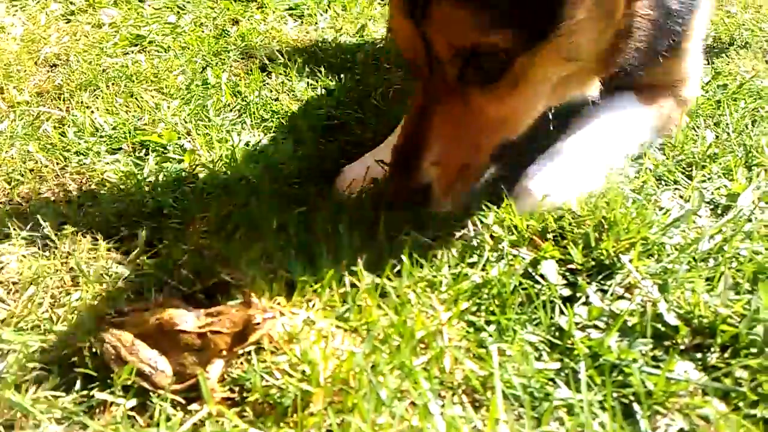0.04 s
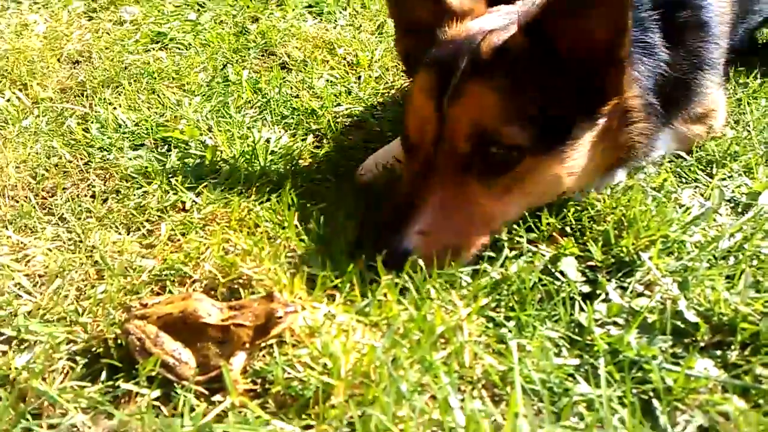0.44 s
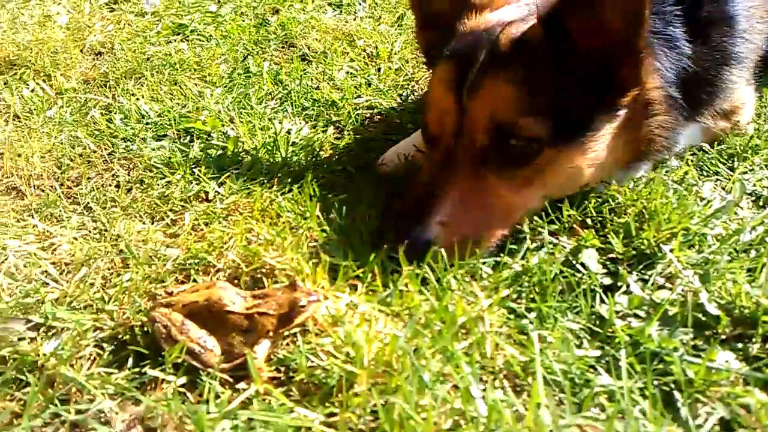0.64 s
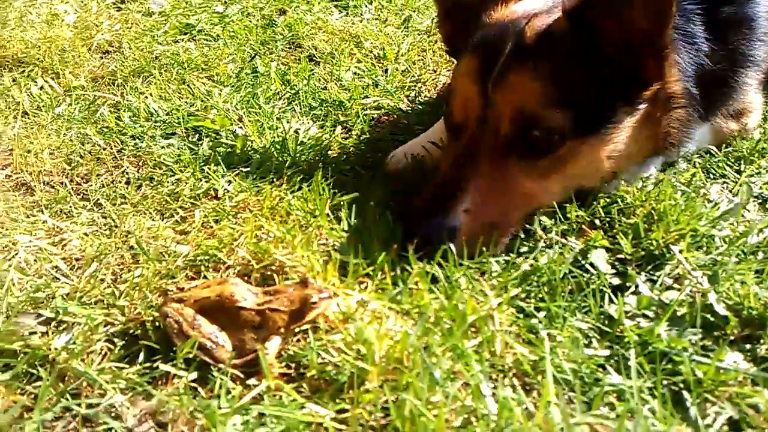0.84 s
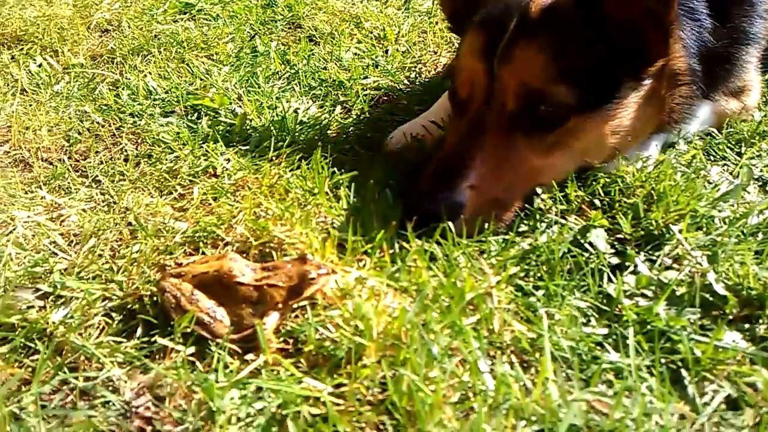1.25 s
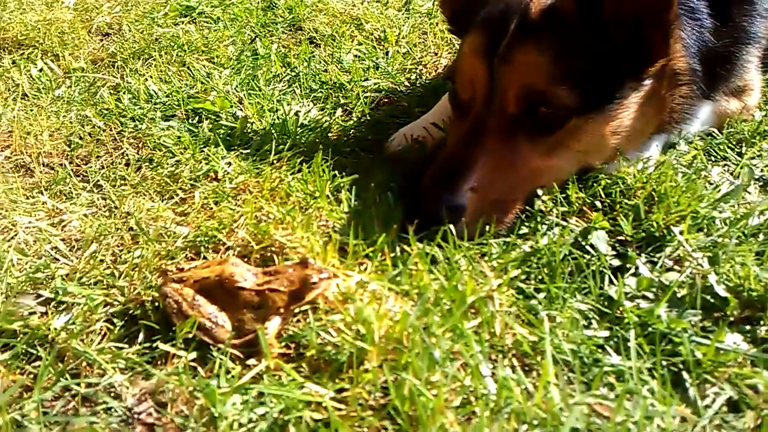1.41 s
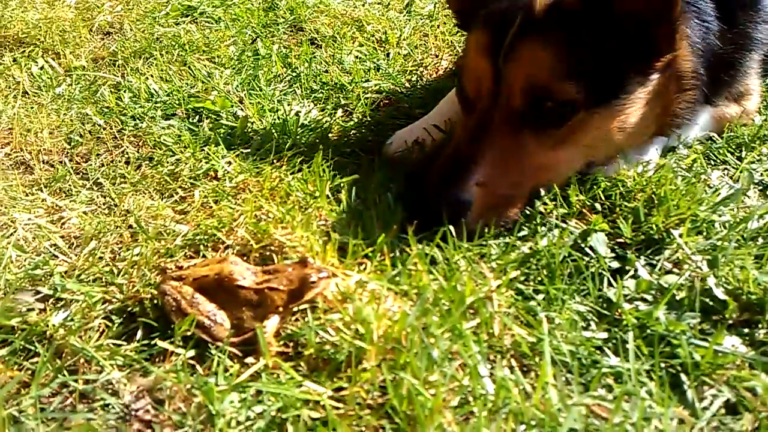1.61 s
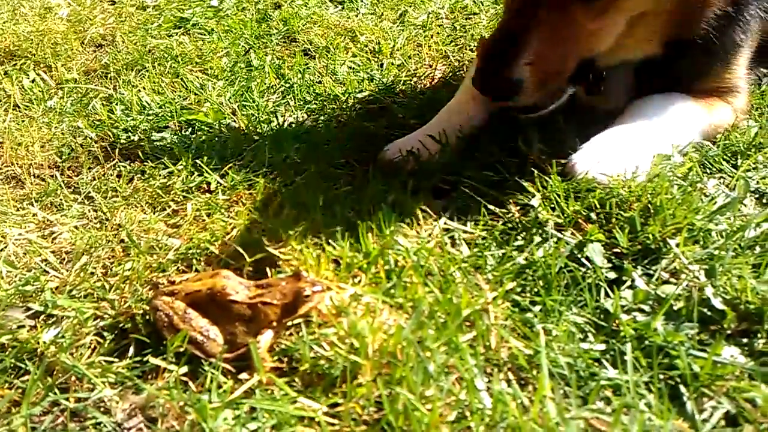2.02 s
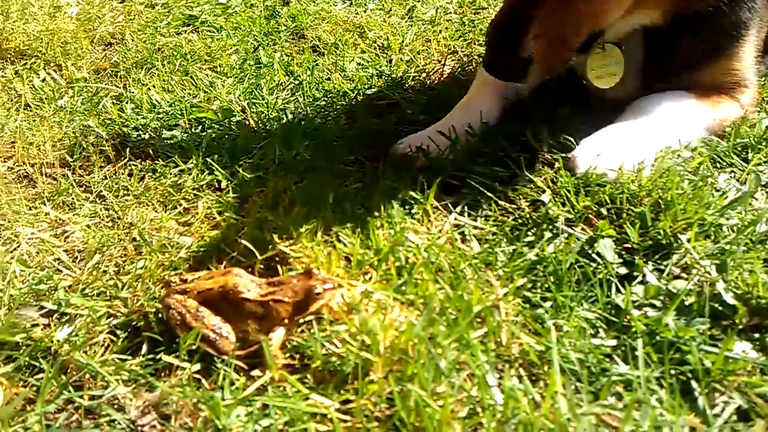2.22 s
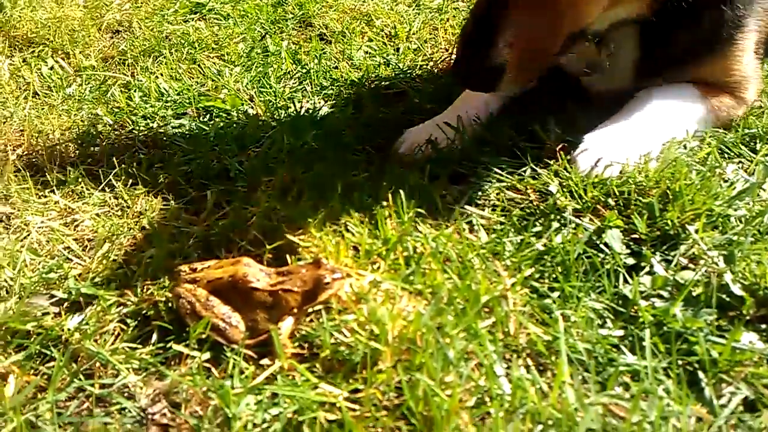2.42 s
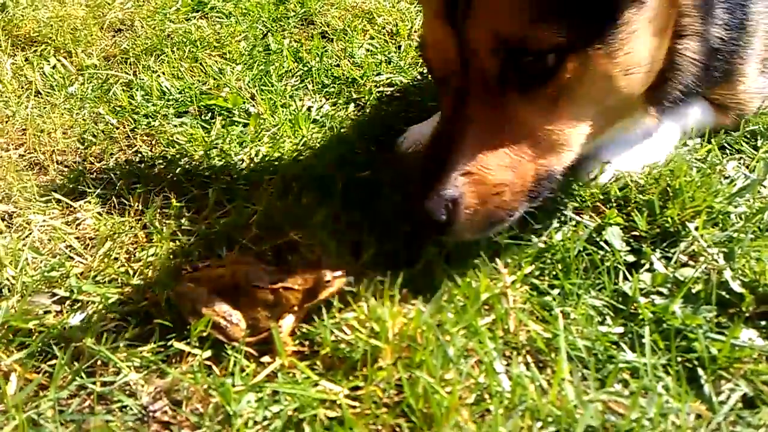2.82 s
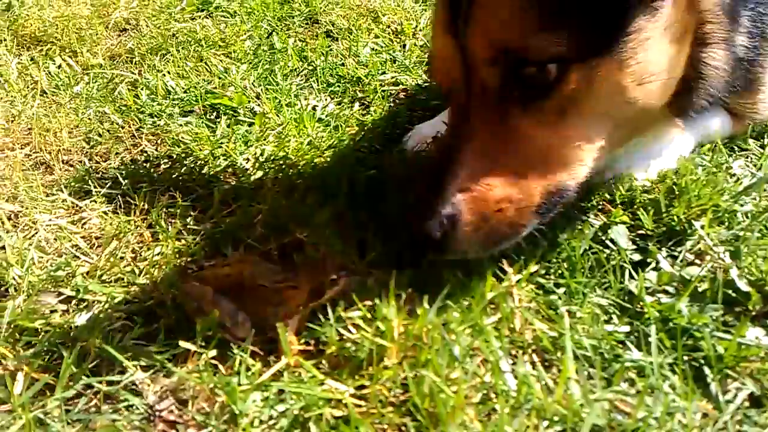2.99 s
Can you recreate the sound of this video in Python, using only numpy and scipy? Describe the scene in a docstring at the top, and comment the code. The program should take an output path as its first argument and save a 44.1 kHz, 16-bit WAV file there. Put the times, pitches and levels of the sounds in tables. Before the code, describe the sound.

Metal tags on a dog's collar clink close by, high and quickly damped, from the start to about 0.5 seconds, with light grass rustles. A lull follows, holding quiet garden air, a barely audible motor hum and a few thin, distant bird notes. From about 2 to 3 seconds the tags clink again in a longer, busier bunch, with small ticks, soft lip smacks and faint rustling.

```python
"""A garden lawn, one microphone close to a dog that nudges about, watching a frog. The metal tags on
its collar clink in two bunches, each ring choked as the tags fall together again; between strikes
they shimmer, slide and tick. Grass rustles under its paws and its lips smack softly. Far off, a bird
slurs a few thin notes over quiet garden air and the faint hum of a motor."""
import sys
import numpy as np
from scipy import signal
from scipy.fft import rfft, irfft
from scipy.io import wavfile

SR = 44100
rng = np.random.default_rng(int(sys.argv[2]) if len(sys.argv) > 2 else 0)


def store_pcm(level_fs):
    """Save levels as 16-bit WAV."""
    pcm = np.round(np.clip(level_fs, -1, 1) * 32767).astype(np.int16)
    wavfile.write(sys.argv[1], SR, np.atleast_2d(pcm).T)


N = 138915
T = np.arange(N) / SR
HZ = np.fft.rfftfreq(N, 1 / SR)

CHOKE_STEEPNESS, DETUNE_SHARE, CHATTER_HZ = 3, .0008, 170
CONTACT_DB, CONTACT_HZ, CONTACT_S = -10, 5360, .0007
# modes of the struck tag: pitch_hz
TAG_PITCHES = [5538, 7020, 7485, 8516]
# the same modes: level_db, t60_s
TAG_RINGS = [(0, 0.11), (-25.5, 0.04), (-17.5, 0.27), (-26, 0.022)]
# tag strikes: start_s, level_db, attack_s, choke_s, upper_modes_db, rattle_share
TAG_STRIKES = [(-.004, -48, .001, 0.018, 14, .1), (0.0718, -41, .0004, 0.0052, 13, .3),
               (0.22, -34, .004, 0.0059, 2.5, 0.5), (0.2274, -18.5, .0004, 0.019, -10, 0.19),
               (0.256, -32, .006, 0.03, 5, 0.3), (0.3386, -21, .0005, 0.023, -5.5, 0.15),
               (0.348, -23, .002, 0.0089, -2, 0.33), (0.3757, -15.5, 0.0011, .011, -13, 0),
               (0.396, -36, .003, 0.0078, 2, .3), (.404, -32, .001, 0.0061, -6.5, .1),
               (2.0422, -39, .001, 0.054, 0, 0.42), (2.156, -42, .001, 0.0086, -10.5, 0.3),
               (2.2426, -20.5, 0.00033, 0.0088, -4.5, .04), (2.295, -34.5, 0.00027, .004, -2, 0.2),
               (2.4533, -29, 0.00017, 0.094, 5.5, 0.2), (2.488, -19.5, 0.00089, 0.0096, 5, 0.26),
               (2.5441, -20.5, 0.00013, .009, 2, 0.2), (2.588, -27.5, 0.018, 0.031, -4, 0.1),
               (2.6158, -19.5, 0.0096, 0.019, -15, 0.3), (2.639, -41.5, .003, 0.026, 0, 0.4),
               (2.7357, -28.5, 0.00025, 0.028, -3, 0), (2.7527, -22, 0.00059, 0.065, -5, 0.2),
               (2.7788, -25, .002, 0.013, 1, .1), (2.7963, -33.5, .001, 0.063, 1, .15),
               (2.830, -35, .004, 0.018, -1, .7), (2.8465, -26.5, .0006, 0.0087, 10, 0.38),
               (2.856, -30.5, .0008, 0.0075, -4, 0.3), (2.872, -39, .002, 0.02, -3.5, .7),
               (2.8889, -26.5, 0.0001, 0.0054, -5, 0.28), (2.897, -31.5, .0003, 0.0066, 2, .15)]
def tag_clinks():
    """Close to the microphone, each strike or graze rings a tag until its neighbour chokes it."""
    out, chatter = np.zeros(N), narrow_noise(0, CHATTER_HZ)
    for start, db, attack, choke, upper_db, rattle in TAG_STRIKES:
        live = (T > start) & (T < start + 2 * choke)
        t = T[live] - start
        contact_gain = from_db(CONTACT_DB) * np.exp(-attack / (10 * CONTACT_S))   # weaker for a graze
        contact = contact_gain * np.exp(-t / CONTACT_S) * np.sin(2 * np.pi * CONTACT_HZ * t)
        envelope = choked(t, attack, choke) * (1 + rattle * chatter[live])
        ring = 0
        for k, (hz, (mode_db, t60)) in enumerate(zip(TAG_PITCHES, TAG_RINGS)):
            pitch = hz * (1 + DETUNE_SHARE * rng.standard_normal())
            ring += from_db(mode_db + upper_db * (k > 0)) * mode(t, pitch, t60)
        out[live] += from_db(db) * (contact + envelope * ring)
    return out


# modes of the free-hanging tag: pitch_hz
FREE_TAG_PITCHES = [6632, 7482, 7956, 8044]
# the same modes: level_db, t60_s
FREE_TAG_RINGS = [(-8, .3), (-11.5, 0.32), (-5.5, 0.52), (-5, 0.43)]
# its after-rings: start_s, level_db, tilt_db_per_khz, choke_s
AFTER_RINGS = [(.229, -42.5, 1, 0.092), (2.243, -51, 0, 0.067), (2.489, -40, 8.5, 0.045),
               (2.546, -42.5, 1, .09), (2.620, -42, 1.5, 0.066), (2.755, -48, -5, 0.072),
               (2.907, -50.5, -17, .04)]
def tag_shimmer():
    """The neighbouring tag hangs free and rings on faintly, its close modes beating."""
    out = np.zeros(N)
    for start, db, tilt, choke in AFTER_RINGS:
        t = since(start)
        envelope = choked(t, attack_s=.0021, choke_s=choke)
        for hz, (mode_db, t60) in zip(FREE_TAG_PITCHES, FREE_TAG_RINGS):
            tilt_db = tilt * (hz - np.mean(FREE_TAG_PITCHES)) / 1000
            out += from_db(db + mode_db + tilt_db) * envelope * mode(t, hz, t60)
    return out


# tags sliding on their ring: start_s, length_s, pitch_hz, level_db
TAG_SLIDES = [(2.102, 0.039, 7050, -54.5), (2.426, 0.058, 6960, -49.5), (2.61, .12, 4650, -58),
              (2.713, 0.023, 7100, -47.5), (2.918, .05, 4650, -58.5), (2.98, 0.16, 7130, -47.5)]
def tag_slides():
    """Metal rubbing lightly on metal keeps one narrow resonance alive."""
    return sum(from_db(db) * swell(start, length) * narrow_noise(hz, width_hz=69)
               for start, length, hz, db in TAG_SLIDES)


# ticks of tags and blades: start_s, peak_db, centre_hz, decay_s, half_width_share
DRY_TICKS = [(0.049, -34.5, 6860, 0.00038, 0.19), (0.0845, -30.5, 7000, 0.00054, 0.11),
             (0.0937, -42, 3050, 0.00099, 0.32), (0.373, -25.5, 6500, 0.0007, 0.13),
             (0.449, -33, 6530, 0.0011, 0.092), (1.0953, -31.5, 7070, 0.0012, 0.12),
             (1.0974, -35, 3830, 0.0018, 0.086), (1.593, -38.5, 6860, 0.00051, 0.1),
             (2.0391, -21, 6540, 0.0009, 0.11), (2.380, -30.5, 6200, .001, 0.18),
             (2.386, -25, 6570, 0.0011, .15), (2.998, -28, 6440, .001, 0.2)]
def ticks(grit=.35):
    """Tags touch and blades snap: a click with a gritty tail, through one broad resonance."""
    out = np.zeros(N)
    for start, db, hz, decay, half_width in DRY_TICKS:
        edges_hz = [hz * (1 - half_width), hz * (1 + half_width)]
        band = signal.butter(2, edges_hz, "band", fs=SR, output="sos")
        tail = (T > start) * np.exp(-np.minimum(since(start) / decay, 20))
        force = grit * rng.standard_normal(N) * tail
        force[int(start * SR)] += 1
        burst = signal.sosfilt(band, force + 1e-18)
        out += from_db(db) * burst / np.abs(burst).max()
    return out


# spectrum of brushed blades: frequency_hz, level_db
BRUSH_SPECTRUM = [(2500, -65.5), (4500, -2.5), (6000, 6), (7200, 14.5), (8500, -7)]
# spectrum of pressed grass: frequency_hz, level_db
CRUNCH_SPECTRUM = [(25, 4), (120, -1), (400, 7.5), (900, -4), (2500, -1.5), (5000, 5), (8500, -7)]
# rustles underfoot: peak_s, width_s, level_db, relative_crunch_db
PAW_RUSTLES = [(.096, 0.0046, -48, 4), (0.107, 0.026, -49.5, -5.5), (.347, .009, -40.5, -32),
               (0.376, .008, -36, -41), (0.427, 0.0068, -43, -2.5), (.62, 0.04, -53.5, -30),
               (.797, 0.0045, -54, 0.5), (2.143, .018, -52.5, 2), (2.345, 0.033, -61, 2.5),
               (2.382, 0.0073, -46, -7.5), (3.0, 0.016, -47, -8.5)]
def grass(grains_per_s=1700, spread_db=3):
    """Under the paws, blades brush and crackle in dense grains; pressed harder they crunch."""
    sizes = from_db(spread_db * np.minimum(rng.exponential(1, N), 4)) * rng.choice([-1, 1], N)
    crackle = rms_one(sizes * (rng.random(N) < grains_per_s / SR))
    grains = crackle + rng.standard_normal(N)
    brush = colour(grains, BRUSH_SPECTRUM)
    crunch = colour(np.roll(grains, N // 2), CRUNCH_SPECTRUM)
    out = np.zeros(N)
    for peak, width, db, crunch_db in PAW_RUSTLES:
        envelope = np.exp(-.5 * ((T - peak) / width) ** 2)
        out += from_db(db) * envelope * (brush + from_db(crunch_db) * crunch)
    return out


# smacks of lips and paws: start_s, peak_db, pitch_hz, length_s
SOFT_SMACKS = [(0.091, -46.5, 157.5, 0.017), (1.948, -50, 840, 0.0063), (2.1235, -35.5, 620, 0.0031),
               (2.147, -38.5, 556, 0.0063), (2.164, -47, 850, 0.0072), (2.3275, -41.5, 1333, .004),
               (2.448, -44, 192, 0.011), (2.520, -48, 151, 0.019), (2.987, -44, 760, 0.0098),
               (3.0, -46, 780, 0.0051)]
def smacks():
    """Each soft, close smack is a few cycles of one low resonance."""
    out = np.zeros(N)
    for start, db, hz, length in SOFT_SMACKS:
        t = since(start)
        out += from_db(db) * np.sin(2 * np.pi * hz * t) * puff(t / length)
    return out


# slurred notes: start_s, length_s, start_hz, end_hz, level_db
BIRD_NOTES = [(0.718, 0.063, 7600, 6670, -53), (1.209, 0.043, 3610, 4400, -57),
              (1.28, 0.043, 4000, 5040, -56.5), (1.393, 0.064, 5270, 6100, -58.5),
              (1.74, 0.2, 5300, 5010, -60), (2.221, 0.099, 3400, 4130, -59),
              (2.313, 0.053, 4790, 5600, -52.5), (3.051, 0.049, 3250, 3430, -61.5)]
def far_bird(blur_hz=520):
    """Thin gliding notes, blurred by their distance from the microphone."""
    out = np.zeros(N)
    for start, length, start_hz, end_hz, db in BIRD_NOTES:
        glide_hz = np.interp(T, [start, start + length], [start_hz, end_hz])
        out += from_db(db) * swell(start, length) * narrow_noise(glide_hz, blur_hz)
    return out


# spectrum of the garden air: frequency_hz, level_db
AIR_SPECTRUM = [(25, -4), (50, 3), (90, 2.5), (160, -1.5), (300, -2.5), (600, -5.5), (1000, -8),
                (2300, -13), (4000, -12), (5800, -12.5), (6600, -8), (7300, -1.5), (8200, -13),
                (9000, -26.5)]
# drift of the treble hiss: time_s, gain_db
HISS_DRIFT = [(0, 2.5), (.45, 3.5), (.75, 2), (1.0, 0), (1.6, 0), (2.2, 1.5), (3.15, 3.5)]
def garden_air(level_db=-53.5, hiss_edge_hz=4700, flutter_db=1.84):
    """Quiet air all round the microphone; its high hiss drifts and flickers."""
    noise = colour(rng.standard_normal(N), AIR_SPECTRUM)
    hiss = irfft(rfft(noise) * (HZ > hiss_edge_hz), N)
    hiss_db = np.interp(T, *np.transpose(HISS_DRIFT)) + flutter_db * narrow_noise(0, width_hz=40)
    return from_db(level_db) * (noise - hiss + from_db(hiss_db) * hiss)


# tones of the hum: pitch_hz, level_db
MOTOR_TONES = [(87, -75), (135, -73.5), (333, -76.5), (380, -80), (474, -69.5), (522, -73), (713, -79)]
def far_motor():
    """A distant motor hums in a few faint, wavering tones."""
    return sum(from_db(db) * narrow_noise(hz, width_hz=4) for hz, db in MOTOR_TONES)


def garden_scatter(x, level_db=-28, t60_s=.15):
    """Fences and plants return a weak, short tail."""
    tail = rng.standard_normal(N) * np.exp(-np.log(1000) * T / t60_s)
    return from_db(level_db) * signal.fftconvolve(x, tail / np.linalg.norm(tail))[:N]


def from_db(db):
    """Decibels to gain."""
    return 10 ** (np.asarray(db) / 20)


def rms_one(x):
    """Scale to unit rms."""
    return x / np.sqrt(np.mean(x ** 2) + 1e-20)


def colour(x, spectrum):
    """Filter by a curve of (frequency_hz, level_db) points; rms 1."""
    hz, db = np.transpose(spectrum)
    gain = from_db(np.interp(np.log(HZ + 1), np.log(hz), db))
    return rms_one(irfft(rfft(x) * gain, N))


def narrow_noise(hz, width_hz):
    """Noise in one resonance whose centre may move; rms 1."""
    slow = irfft(rfft(rng.standard_normal((2, N))) / (1 + (HZ / width_hz) ** 2), N)
    phase = 2 * np.pi * np.cumsum(np.broadcast_to(hz, N)) / SR
    return rms_one(slow[0] * np.cos(phase) + slow[1] * np.sin(phase))


def since(start):
    """Seconds since an onset, zero before it."""
    return np.maximum(T - start, 0)


def mode(t, hz, t60):
    """A sine that dies away by 60 dB in t60 seconds."""
    return np.exp(-np.log(1000) * t / t60) * np.sin(2 * np.pi * hz * t)


def choked(t, attack_s, choke_s):
    """An envelope that rises, then falls steeply around choke_s."""
    rise = 1 - np.exp(-t / attack_s)
    return rise * np.exp(-np.minimum((t / choke_s) ** CHOKE_STEEPNESS, 20))


def swell(start, length):
    """A rounded rise and fall."""
    return np.sqrt(np.abs(np.sin(np.pi * np.clip((T - start) / length, 0, 1))))


def puff(u):
    """Quick rise, slower fall, height 1, nearly over at u = 1."""
    shape = u * np.exp(-(2 * u) ** 1.8)
    return shape / shape.max()


def scene():
    """The dog close to the microphone, the garden behind; mono."""
    dog = ticks() + tag_clinks() + tag_shimmer() + tag_slides() + smacks() + grass()
    return (dog + garden_scatter(dog) + far_bird() + garden_air() + far_motor())[None]


def record(dry):
    """The microphone's signal is cut steeply at the top."""
    cutoff_hz = 8500
    return signal.sosfilt(signal.cheby1(12, .1, cutoff_hz, fs=SR, output="sos"), dry)


dry = scene()
out = record(dry)
store_pcm(out)
```